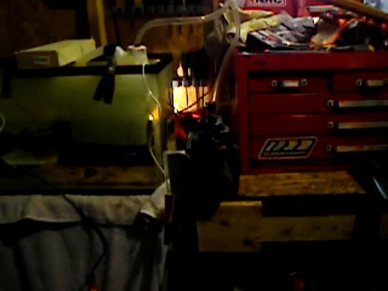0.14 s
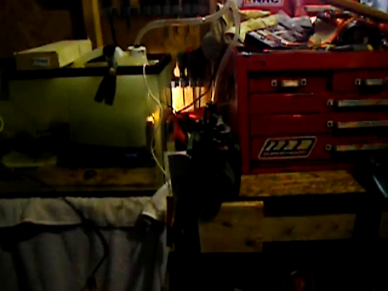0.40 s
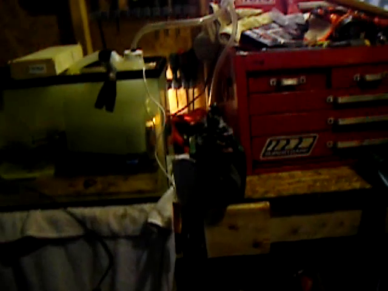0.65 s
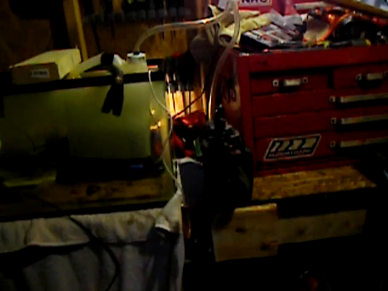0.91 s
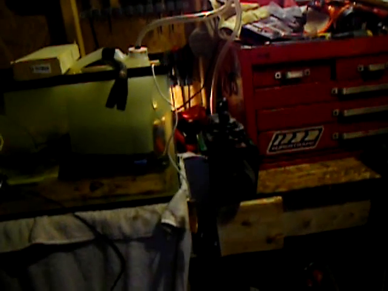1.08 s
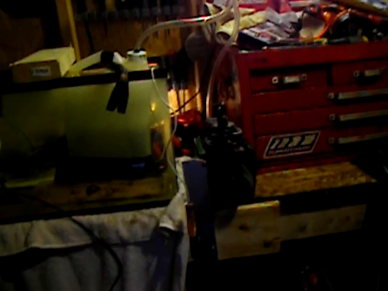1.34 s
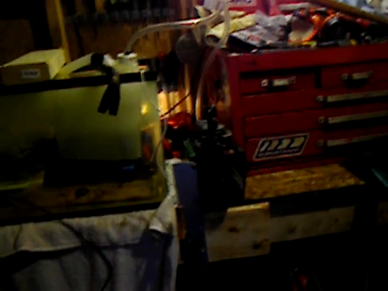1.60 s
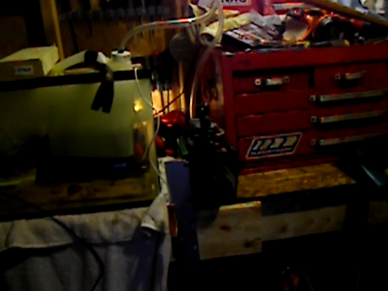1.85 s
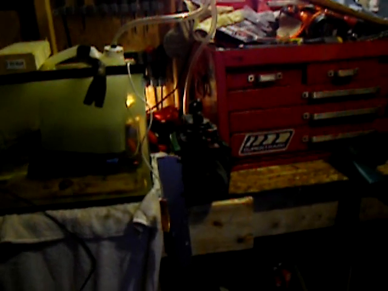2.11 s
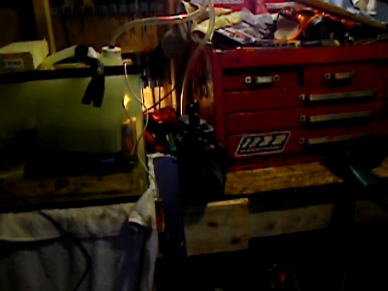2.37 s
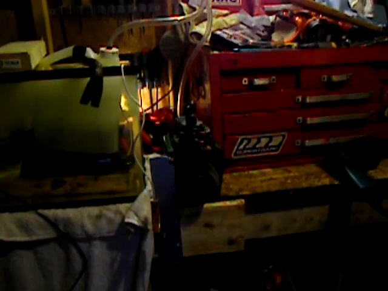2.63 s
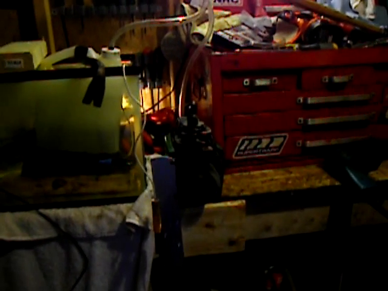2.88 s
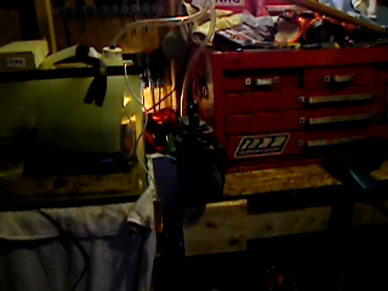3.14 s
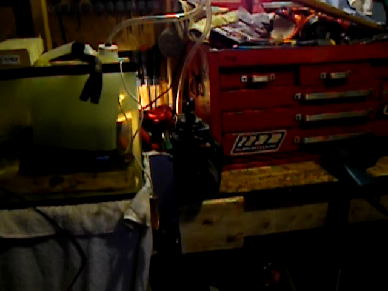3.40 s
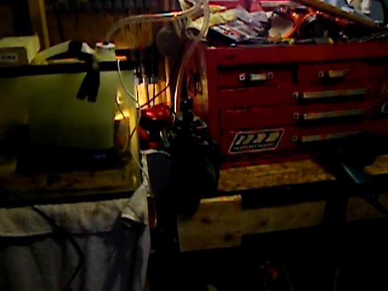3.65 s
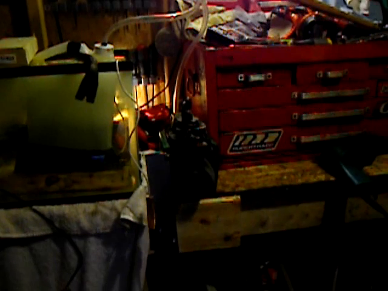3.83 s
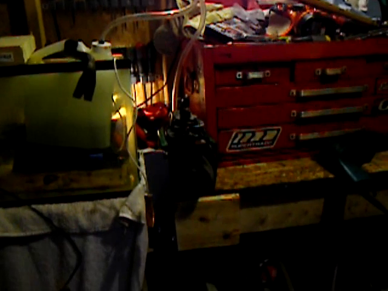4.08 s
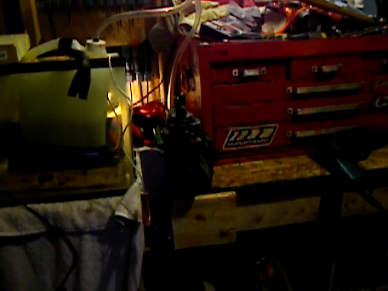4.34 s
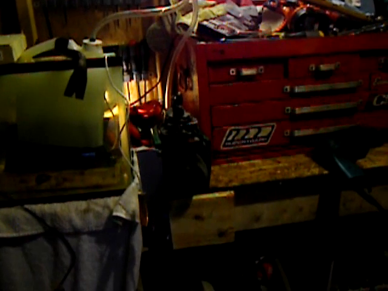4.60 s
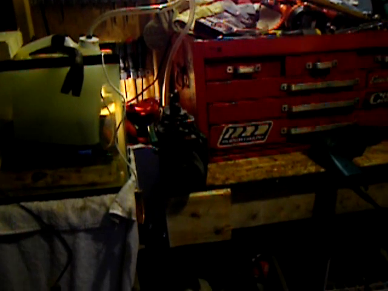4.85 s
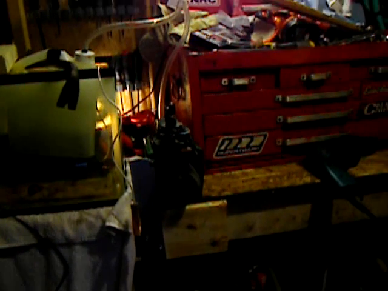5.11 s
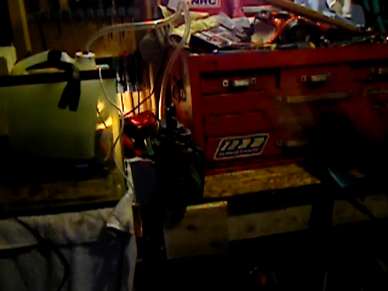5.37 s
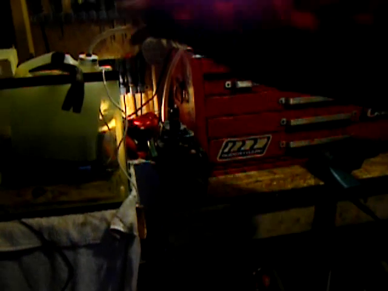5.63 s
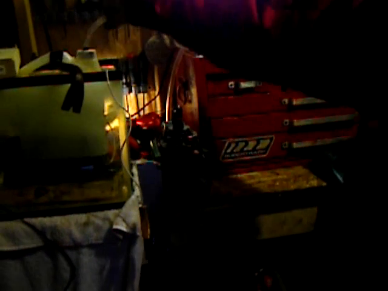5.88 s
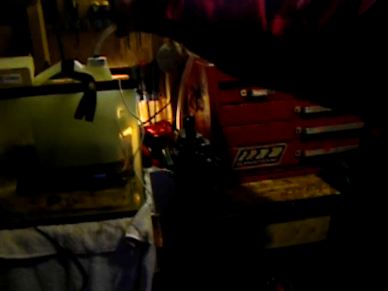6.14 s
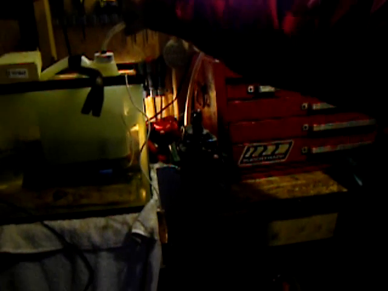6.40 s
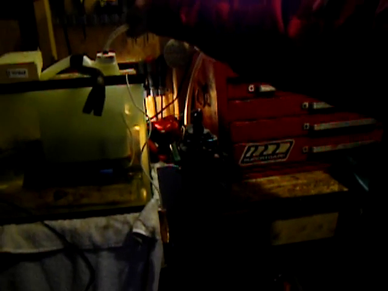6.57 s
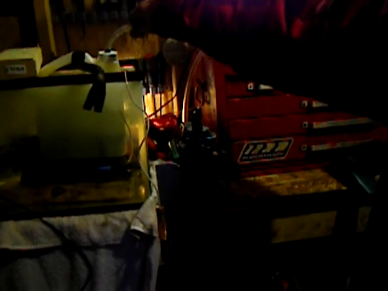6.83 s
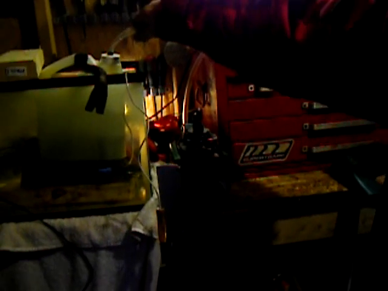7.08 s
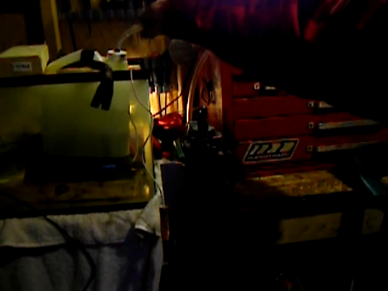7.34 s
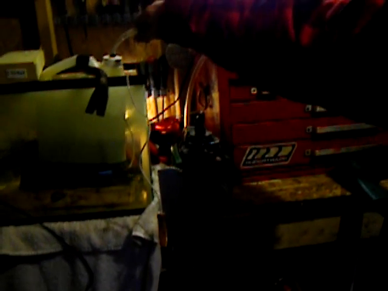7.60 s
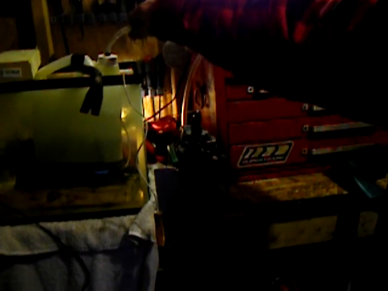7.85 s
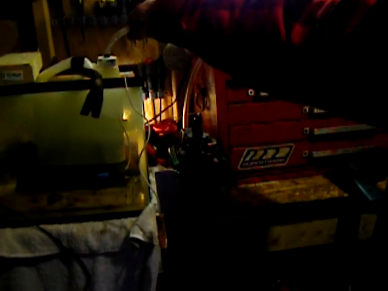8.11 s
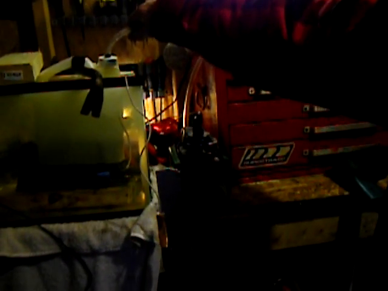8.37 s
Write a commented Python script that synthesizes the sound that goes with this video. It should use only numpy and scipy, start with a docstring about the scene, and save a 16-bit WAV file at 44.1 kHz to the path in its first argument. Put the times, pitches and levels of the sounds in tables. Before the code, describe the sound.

Rough, sputtering two-stroke motor on a shaking bench, its raspy bangs ringing indoors, speeding up in short bursts, overdriven and muffled on top.

```python
"""A small two-stroke engine runs rich in a workshop, close to the microphone, over rumble and a shaking bench.
At first it fires about every fourth turn, soon every third, and a few dull thumps come in the first seconds.
From 2 s on, short spells of firing on every turn lift its speed; after 6.4 s the pattern keeps changing.
Each bang is a sharp pulse plus a puff of noisy gas, which ring the exhaust and the cluttered room.
All along, the narrow-band recorder is driven hard and clips."""
import sys
import numpy as np
from scipy import signal
from scipy.fft import rfft, irfft
from scipy.io import wavfile
from scipy.ndimage import uniform_filter1d

SR = 44100
rng = np.random.default_rng(int(sys.argv[2]) if len(sys.argv) > 2 else 0)


def generate_wav(sig):
    """Save sig (samples, or channels by samples) to the path in sys.argv[1] as 16-bit PCM at SR."""
    pcm = np.round(np.clip(np.atleast_2d(sig).T, -1, 1) * 32767).astype(np.int16)
    wavfile.write(sys.argv[1], SR, pcm)


def invert_db(x):
    """Field ratio 10**(x/20) for x, a level in decibels (scalar or array-like)."""
    u = np.asarray(x, float) / 20
    return 10 ** u


N = 373952


def evened(x):
    """Scales to rms 1."""
    return x / np.sqrt(np.mean(x ** 2) + 1e-20)


def read(points, hz):
    """Value of a table on a log-frequency axis."""
    f, value = np.transpose(points)
    return np.interp(np.log(hz + 1), np.log(f + 1), value)


def curve(points):
    """Value of a table at every sample."""
    return np.interp(np.arange(N) / SR, *np.transpose(points))


def catching(lag_s):
    """Rises towards 1 while the engine catches and sinks towards 0 between, with a lag."""
    # spells of firing on every turn: (start [s], length [s])
    catches = [(2.02, .033), (3.552, .02), (4.009, .06), (4.927, .02), (5.22, .13), (5.614, .04),
               (6.572, .105), (6.955, .056), (7.571, .13), (8.227, .157)]
    t = np.arange(N) / SR
    caught = sum((t >= s) & (t < s + length) for s, length in catches)
    kept = np.exp(-1 / (lag_s * SR))
    return signal.lfilter([1 - kept], [1, -kept], caught)


def crank():
    """Turns completed at every sample: catches speed the crank up, and uneven burning makes it wobble."""
    # speed the crank settles at under its load: (time [s], speed [turns per s])
    settled_speed = [(0.0, 90.35), (0.32, 93.27), (0.74, 91.71), (1.95, 92.86), (2.33, 92.06),
                     (3.18, 97.57), (3.68, 98.5), (4.37, 96.56), (5.5, 99.62), (6.21, 97.43),
                     (6.84, 106.12), (7.23, 107.83), (7.35, 103.53), (8.48, 105.25)]
    pull, settle_s = 24.1, 0.515  # a catch adds this many turns per s each second, and the gain ebbs away
    wobble_hz, wobble_turns = [1.5, 7], 0.015  # band and rms of running ahead and behind
    band = signal.butter(2, wobble_hz, "band", fs=SR / 100, output="sos")
    wobble = evened(signal.sosfiltfilt(band, rng.standard_normal(N // 100 + 1)))
    ahead = wobble_turns * np.interp(np.arange(N) / 100, np.arange(len(wobble)), wobble)
    speed = curve(settled_speed) + pull * settle_s * catching(settle_s)
    return np.cumsum(speed) / SR + ahead


def turns(done):
    """Sample at which the port opens on each turn, whether that turn fired, and the dB of its second blast."""
    # how long a charge gathers, each stage lasting until the next:
    # (start [s], wait from bang to bang before any earliness [turns])
    mixture = [(0.05, 4), (0.72, 3), (6.41, 2), (6.6, 1), (6.79, 2.6), (7.01, 2.2), (7.2, 3.3), (7.44, 2),
               (7.53, 1), (7.7, 3), (7.81, 2.2), (8.08, 1.5), (8.17, 1), (8.38, 3)]
    # the hardest bangs, with a second blast on top of the usual one: (time [s], level before halving [dB])
    hard_bangs = [(0.093, 7.7), (0.181, 7.7), (0.224, 6.1), (0.309, 6.1), (0.352, 6.5), (0.439, 7.0),
                  (0.819, 7.0), (0.852, 4.8), (0.917, 6.0), (1.036, 4.3), (1.297, 5.3), (1.437, 8.6),
                  (1.502, 6.5), (1.557, 8.4), (1.633, 4.9), (1.698, 6.0), (1.795, 7.2), (2.246, 3.9),
                  (2.451, 7.1), (2.472, 4.1), (2.59, 6.1), (2.717, 7.1), (2.759, 6.0), (2.843, 6.1),
                  (2.874, 6.4), (2.937, 4.8), (3.0, 6.8), (3.246, 5.3), (3.359, 4.6), (4.05, 5.8),
                  (4.171, 5.3), (4.632, 7.5), (4.938, 5.1), (5.13, 7.5), (5.271, 6.6), (5.383, 7.1),
                  (5.467, 6.7), (5.503, 5.5), (5.525, 6.7), (5.682, 6.8), (5.712, 7.6), (5.742, 5.4),
                  (5.771, 4.5), (5.811, 6.9), (5.862, 5.0), (5.911, 4.8), (5.942, 4.1), (5.972, 7.3),
                  (6.384, 8.7), (6.572, 7.2), (6.909, 10.1), (7.276, 7.4), (7.785, 6.4), (8.421, 7.6)]
    first_turn = 0.345  # share of a turn before the exhaust port first opens
    eager_turns = 0.35  # mean number of turns by which a charge is ready early
    angle = done - first_turn
    opens = np.searchsorted(angle, np.arange(int(angle[-1])))

    start_s, every = np.transpose(mixture)
    stage = np.maximum(np.searchsorted(start_s * SR, opens) - 1, 0)
    wait = every[stage] - rng.exponential(eager_turns, len(opens))
    wait[catching(0.002)[opens] > 0.5] = 0

    hard_s, hard_db = np.transpose(hard_bangs)
    # the blast is heard about 60 samples after the port opens
    hard = abs(opens[:, None] + 60 - hard_s * SR).argmin(0)
    extra_db = np.zeros(len(opens))
    extra_db[hard] = hard_db
    # the charge gathers over the turn before a hard bang, unless that turn was ready at once
    wait[hard - 1] += 9 * (wait[hard - 1] > 1)
    wait[hard] = 0

    fired, since = np.zeros(len(opens), bool), 1
    for turn in range(len(opens)):
        fired[turn] = since >= wait[turn]
        since = 1 if fired[turn] else since + 1
    return opens, fired, extra_db


def exhaust(done):
    """Pressure at the port: short kicks from fired and unfired turns, and noisy turbulent gas behind each."""
    # share of a full bang that the turns in between still burn: (time [s], share [0-1])
    afterburn = [(0, 0.08), (3, 0), (6.4, 0.16), (6.7, 0.5), (7.2, .25), (7.8, .3), (8.48, 0.9)]
    # late charges that pop in the exhaust between turns: (time [s], size [full bangs])
    pops = [(2.609, 0.86), (7.706, 1.2), (8.419, 1.7)]
    next_turn = 0.2  # extra share still burning on the turn right after a bang
    uneven_db, idle_db = 0.08, 3.5  # scatter in the size of kicks; gain of unfired kicks
    idle_puff_db, puff_ms, hiss_db = -17.5, 6.5, -19  # gas of an unfired turn, fading time, steady gas
    harsher = 0.35  # power by which missed turns roughen the next bang

    opens, fired, extra_db = turns(done)
    size, slip = rng.standard_normal((len(opens), 2)).T
    # unfired kicks scatter by twice as many samples
    at = np.clip(opens + np.round(np.where(fired, 1, 2) * slip).astype(int), 0, N - 1)
    hot, cold, harsh, extra = np.zeros((4, N))
    extra[at] = invert_db(extra_db) * (extra_db > 0)
    hot[at[fired]] = invert_db(uneven_db * size[fired])
    share = np.clip(curve(afterburn)[at] + next_turn * np.roll(fired, 1), 0, 1)
    hot[at[~fired]] = (share * invert_db(uneven_db * size))[~fired]
    # near 1 where a bang has bangs on both sides
    in_a_row = fired & np.roll(fired, 1) & np.roll(fired, -1)
    clean = uniform_filter1d(np.interp(np.arange(N), opens, in_a_row), SR // 40)
    for s, pop in pops:
        hot[round(s * SR)] += pop
    cold[at[~fired]] = invert_db(uneven_db * size[~fired])

    # fuel gathered over missed turns makes the next bang rougher
    harsh[at[fired]] = np.diff(np.flatnonzero(fired), prepend=0) ** harsher
    puffs = hot * harsh + invert_db(idle_puff_db) * cold
    bursts = signal.lfilter([1], [1, -np.exp(-1000 / (puff_ms * SR))], puffs)
    gas = (np.roll(bursts, 4) + invert_db(hiss_db)) * rng.standard_normal(N)
    late_cold = invert_db(idle_db) * np.roll(cold, 12)  # lags about a quarter millisecond
    return hot, late_cold, gas, extra, clean


def rings():
    """Answers to a fired and an unfired kick: modes start together, add up to a crack, then ring apart."""
    # what the exhaust and the bench ring with; the sign tells a push from a pull:
    # (frequency [Hz], amplitude after a bang [relative], amplitude after an unfired turn [relative],
    #  time to fall by 60 dB [s])
    ring_modes = [(201.6, 0.046, 0.0095, 0.24), (216.2, -0.11, -0.052, 0.044),
                  (267.5, -0.027, 0.0062, 0.43), (275, 0.0097, 0.08, 0.044), (361.7, -0.093, 0.026, 0.11),
                  (382, 0.12, 0.036, 0.044), (482.6, 0.048, 0.049, 0.041), (540.5, 0.099, -0.073, 0.068),
                  (589.6, -0.036, 0.012, 0.21), (643.6, 0.096, 0.00039, 0.063),
                  (705.6, 0.034, -0.038, 0.075), (776.7, 0.055, -0.0028, 0.09), (796, 0.14, -0.12, 0.052),
                  (822, -0.059, -0.012, 0.13), (855.7, -0.069, 0.018, 0.12), (916.4, 0.052, -0.04, 0.088),
                  (986, -0.0069, 0.01, 0.33), (1014.7, -0.13, 0.022, 0.07), (1181, -0.12, 0.018, 0.0064),
                  (1282, -0.082, 0.00088, 0.1), (1292, 0.17, -0.027, 0.029), (1440, 0.031, -0.04, 0.046),
                  (1473.7, -0.16, 0.024, 0.048), (1605, -0.069, 0.008, 0.057), (1709, -0.12, -0.034, 0.028),
                  (1720, 0.14, 0.12, 0.0026), (2368, 0.029, -0.0081, 0.041), (2670, 0.008, 0.001, 0.077),
                  (2830, -0.016, -0.0085, 0.0047), (2997, -0.051, 0.012, 0.033)]
    t = np.arange(SR // 2) / SR
    hz, fired, unfired, t60 = np.transpose(ring_modes)[:, :, None]
    modes = invert_db(-60 * t / t60) * np.sin(2 * np.pi * hz * t)
    return (fired * modes).sum(0), (unfired * modes).sum(0)


def blast():
    """Sharp smooth dip in pressure that reaches the microphone directly, with a slight rebound."""
    scale_ms, lag_ms = 0.26, 0.45
    u = np.maximum(np.arange(SR // 100) * 1000 / SR - lag_ms, 0) / scale_ms
    return -u ** 2 * np.exp(2 - 2 * u) * (1 - u / 3)


def room(gap_ms=8):
    """Diffuse reflections after a short gap, each band of noise dying at its own speed."""
    # colour of the reflections: (frequency [Hz], relative level [dB])
    room_colour = [(60, -42.5), (150, 0.5), (220, 8.5), (900, 6.5), (1150, 2.5), (1800, 4), (2100, 1),
                   (3600, 0.5), (5000, -2.5)]
    # how fast they die: (frequency [Hz], time to fall by 60 dB [s])
    room_decay = [(200, 1), (800, 0.67), (1800, 0.14), (4000, 0.12)]
    noise = rng.standard_normal(SR // 2)
    noise[:round(gap_ms * SR / 1000)] = 0
    hz, t, z = signal.stft(noise, SR, nperseg=256)
    z *= invert_db(read(room_colour, hz)[:, None] - 60 * t / read(room_decay, hz)[:, None])
    tail = signal.istft(z, SR, nperseg=256)[1]
    return tail / np.linalg.norm(tail)


def reflected(x, count=16):
    """The microphone drifts, so one set of reflections fades slowly into the next."""
    place, out = np.linspace(0, count - 1, N), np.zeros(N)
    for k in range(count):
        fade = np.cos(np.pi / 2 * np.clip(place - k, -1, 1))
        out += signal.oaconvolve(x * fade, room())[:N]
    return out


def engine(done):
    """Kicks ring the modes; the bright edge of the gas is heard directly; the room answers both."""
    # how sound leaves the port and reaches the microphone: (time [s], gain into room [dB], gain of gas [dB])
    path = [(0, -4, 0), (1, -0.5, -1), (3, -1, -1.5), (5.2, -1, 0), (6.4, -3.5, -1.5), (6.6, -2.5, 2.5),
            (6.903, -1.5, -1.5), (7.399, -0.5, -1.5), (7.599, -3, 4.5), (7.901, -3.5, -2.5), (8.3, -0.5, 2),
            (8.48, -4.5, 4)]
    # how squarely the port faces the microphone: (time [s], gain of the usual blast [dB])
    facing = [(0, -5), (1.2, -5.5), (3, -5.5), (3.5, -7), (4.9, -7), (5.4, -5.5), (6, -5.5), (6.3, -6),
              (6.7, -4), (8.48, -4)]
    # firing on every turn burns clean: firm kicks stand over gas and room
    clean_kick_db, clean_gas_db, clean_room_db = 1.5, -3, -5
    gas_direct_db, room_gas_db, room_kick_db = -14, -10, -0.1
    gas_ring_db = -30  # a little turbulence reaches the modes and roughens the note
    unfired_blast = 0.16  # share of the blast that an unfired kick gives

    hot, cold, gas, extra, clean = exhaust(done)
    s, room_db, gas_db = np.transpose(path)
    hot = hot * invert_db(clean_kick_db * clean)
    gas = gas * invert_db(clean_gas_db * clean) * invert_db(curve(np.c_[s, gas_db]))
    bright = signal.sosfilt(signal.butter(2, 1300, "high", fs=SR, output="sos"), gas)

    bang, suck = rings()
    rung = signal.oaconvolve(hot + invert_db(gas_ring_db) * gas, bang)[:N]
    rung += signal.oaconvolve(cold, suck)[:N]
    usual_blast = invert_db(curve(facing)) * (hot + unfired_blast * cold)
    rung += signal.oaconvolve(extra / 2 + usual_blast, blast())[:N]

    leaving = invert_db(room_kick_db) * (hot - cold) + invert_db(room_gas_db) * bright
    echoes = reflected(invert_db(curve(np.c_[s, room_db])) * leaving)
    return rung + invert_db(clean_room_db * clean) * echoes + invert_db(gas_direct_db) * bright


def coloured(x):
    """Blends the colours of the path by where the microphone and the arm are."""
    # colour of the path from four places: (frequency [Hz], at first [dB], a step aside [dB],
    # from further left [dB], with an arm reaching over the engine [dB])
    place_colours = [(250, -0.5, -1.5, -2, -5.5), (416, 5.5, -4, 0.5, -1), (475, 3, -0.5, -6, 1),
                     (545, -8, 2, 2, -3), (580, 2, 0.5, 0, 1.5), (730, -3, 2, 0.5, 3.5),
                     (740, 2, -7, -4, 4.5), (804, -1.5, 2.5, -4.5, -5), (920, 1, -9, 4, 4),
                     (986, 2, 8.5, 4, -12), (917, -4.5, -0.5, -1, -3.5), (1250, 1.5, -3, 4.5, 6),
                     (1350, 0, -3, 1.5, -5.5), (1720, -2, -3.5, -0.5, -0.5), (2000, -0.5, -2, -2, 1),
                     (2380, 1.5, -0.5, 2, 0), (2770, -2.5, -2.5, 0, -2), (3800, 1.5, 0, -0.5, 1)]
    # share of each colour: (time [s], first [0-1], aside [0-1], left [0-1], arm [0-1])
    stance = [(0, 1, 0, 0, 0.1), (.85, 0.8, 0.07, 0.7, 0), (1.05, 0.2, 0.92, 0.07, 0),
              (2.9, 0.02, 0.8, 0.2, 0), (3.1, 0.05, 0.1, 0.9, 0.2), (5.3, 0.05, 0.3, 1, 0.1),
              (5.701, 0.3, 0.04, 0.1, 0.1), (6.549, 0, 0, 0, 0.1), (6.7, 0.2, 0.2, 0, 1),
              (8.48, 0.2, 0.08, 0.01, 0.95)]
    hz, t, z = signal.stft(x, SR, nperseg=1024, noverlap=768)
    f, *colours = np.transpose(place_colours)
    s, *shares = np.transpose(stance)
    db = sum(np.outer(read(np.c_[f, c], hz), np.interp(t, s, w)) for c, w in zip(colours, shares))
    return signal.istft(z * invert_db(db), SR, nperseg=1024, noverlap=768)[1][:N]


def shake(done):
    """The piston shakes the bench: clean tones locked to the crank."""
    # (time [s], level once a turn [dB rms], level twice a turn [dB rms])
    shake_levels = [(0, -46, -33), (2.5, -42, -36.5), (5, -46, -32.5), (5.399, -49.5, -25),
                    (6.2, -39, -34.5), (8.48, -42, -49.5)]
    angle = 2 * np.pi * done
    s, once_db, twice_db = np.transpose(shake_levels)
    once, twice = (invert_db(curve(np.c_[s, db])) for db in (once_db, twice_db))
    return np.sqrt(2) * (once * np.sin(angle) - twice * np.sin(2 * angle))


def rumble():
    """Low shaped noise that shakes the microphone."""
    # colour: (frequency [Hz], relative level [dB])
    rumble_colour = [(3, 4.5), (15, -3.5), (40, -12.5), (150, -9.5), (300, -3.5), (1000, -62.5)]
    # loudness: (time [s], level [dB rms])
    rumble_level = [(0, -24.5), (.6, -30), (1.5, -27), (3, -30), (7, -31.5), (8.48, -28.5)]
    hz = np.fft.rfftfreq(N, 1 / SR)
    noise = irfft(rfft(rng.standard_normal(N)) * invert_db(read(rumble_colour, hz)), N)
    return invert_db(curve(rumble_level)) * evened(noise)


def thumps():
    """Dull thumps: each is a soft low push that rises and dies in a few cycles."""
    # (time [s], peak of the swell [dB], frequency [Hz])
    thump_list = [(0.298, -17.5, 61.5), (0.85, -24.5, 110), (1.103, -20, 243.5), (1.3, -31.5, 137)]
    rise_s = 0.0088
    out = np.zeros(N)
    for s, db, hz in thump_list:
        t = np.maximum(np.arange(N) / SR - s, 0)
        swell = t / rise_s * np.exp(1 - t / rise_s)
        out += invert_db(db) * swell * np.sin(2 * np.pi * hz * t)
    return out


def scene():
    """The engine, its loudness held to a slow curve, over the shaking bench, the rumble and the thumps."""
    # loudness of the engine, held to this over a third of a second, before the swell of a catch: (time [s],
    # level [dB rms])
    engine_level = [(0, -10.5), (.7, -11), (3, -12), (5.1, -11.5), (5.22, -11.5), (5.31, -13), (5.45, -10),
                    (5.56, -13), (5.63, -10.5), (5.69, -11.5), (6.15, -12), (6.4, -11), (6.9, -12.5),
                    (7.25, -11.5), (7.53, -11.5), (7.68, -11.5), (7.77, -13), (8.2, -12), (8.3, -12),
                    (8.48, -12.5)]
    surge_db, surge_lag_s = 2, 0.05  # a catch swells the sound by up to this much
    done = crank()
    sound = coloured(engine(done))
    # the sound is held to the table's power over a third of a second
    power = uniform_filter1d(uniform_filter1d(sound ** 2, SR // 6), SR // 6)
    level_db = curve(engine_level) + surge_db * catching(surge_lag_s)
    loud_engine = invert_db(level_db) * sound / np.sqrt(power)
    return (loud_engine + shake(done) + rumble() + thumps())[None]


def low_pass(x):
    """Removes everything above the highest recorded frequency."""
    return signal.sosfilt(signal.butter(12, 15870, fs=SR, output="sos"), x)


def record(dry):
    """Soft overload, a steep narrow-band filter, a steady offset, and hard clipping."""
    knee, offset, ceiling = 0.76, -0.029, 0.705  # of full scale
    soft = knee * np.tanh(dry / knee)
    narrow = signal.sosfilt(signal.cheby2(10, 60, 4850, fs=SR, output="sos"), soft)
    narrow = signal.sosfilt(signal.butter(4, 4150, fs=SR, output="sos"), narrow)
    return low_pass(np.clip(narrow + offset, -ceiling, ceiling))


dry = scene()
out = record(dry)
generate_wav(out)
```